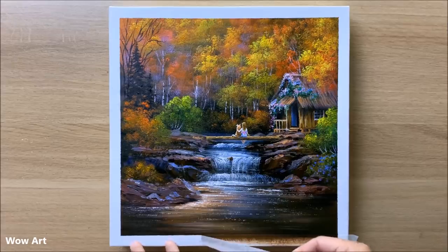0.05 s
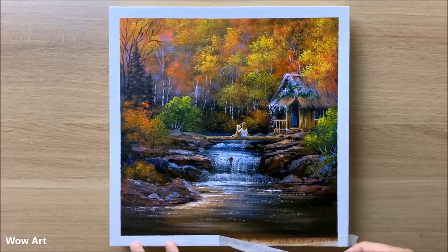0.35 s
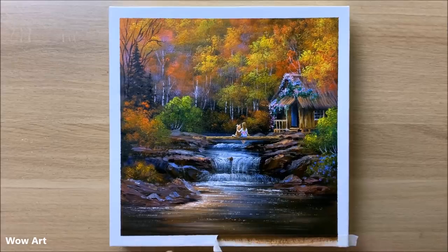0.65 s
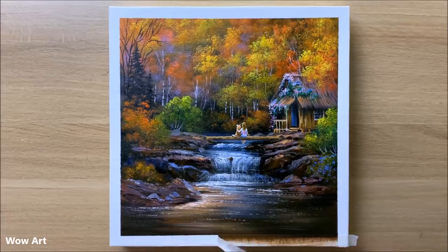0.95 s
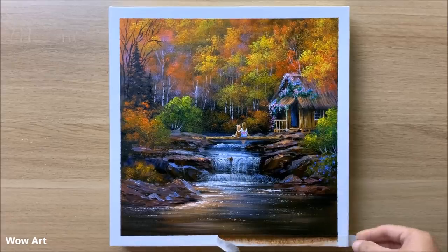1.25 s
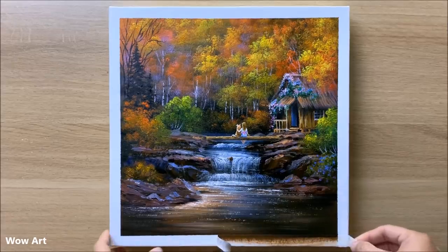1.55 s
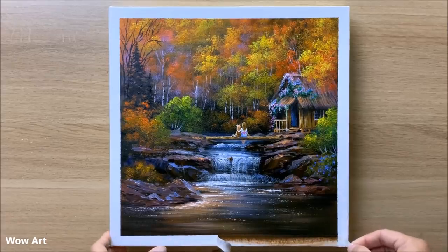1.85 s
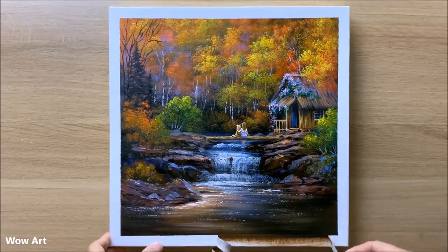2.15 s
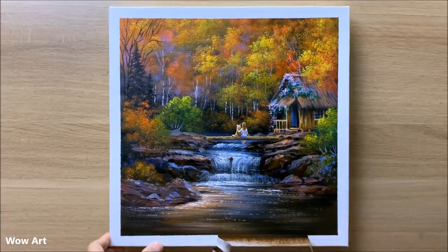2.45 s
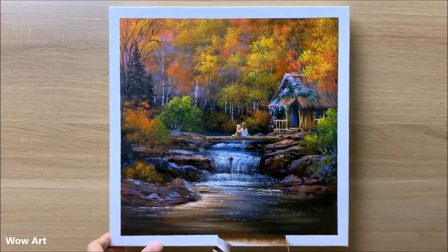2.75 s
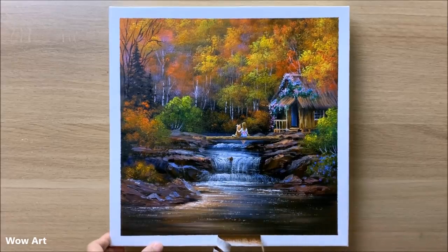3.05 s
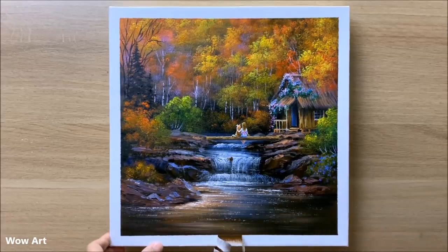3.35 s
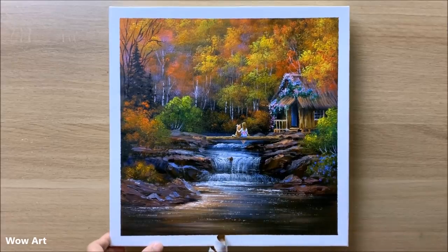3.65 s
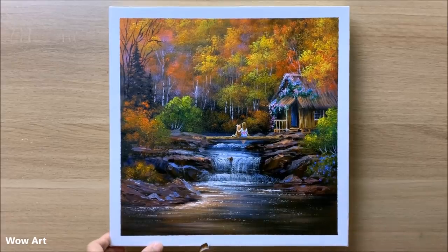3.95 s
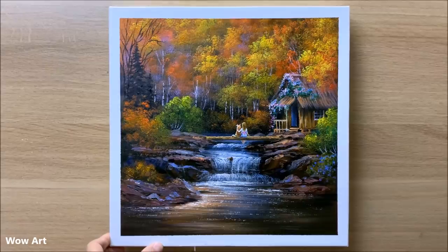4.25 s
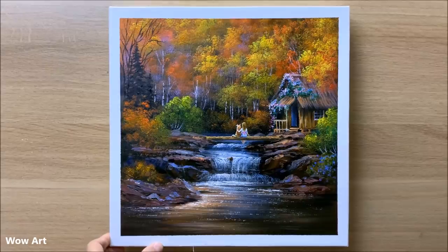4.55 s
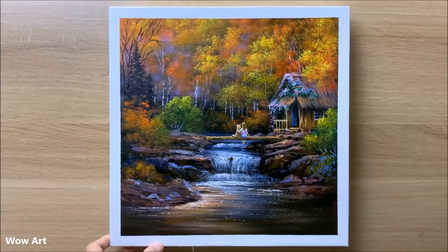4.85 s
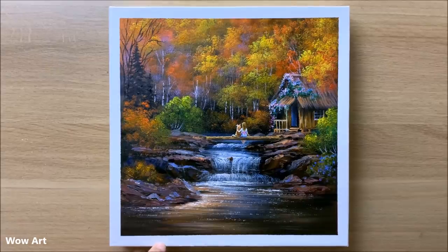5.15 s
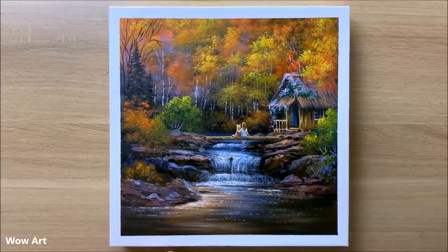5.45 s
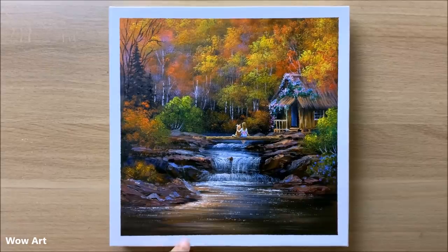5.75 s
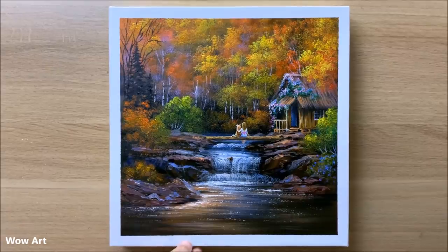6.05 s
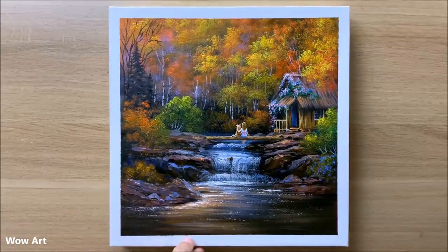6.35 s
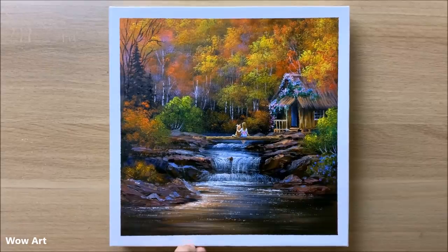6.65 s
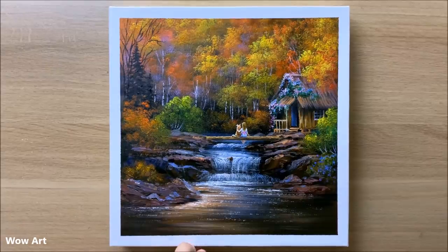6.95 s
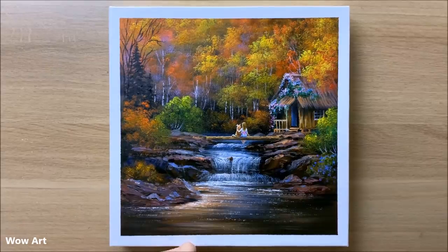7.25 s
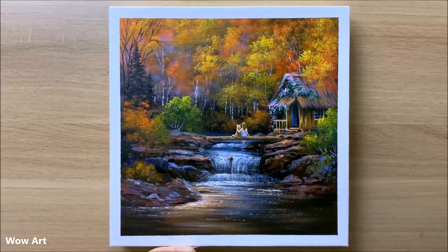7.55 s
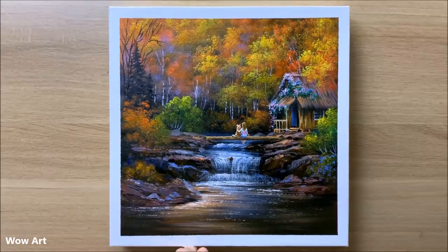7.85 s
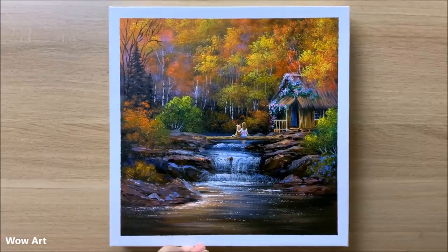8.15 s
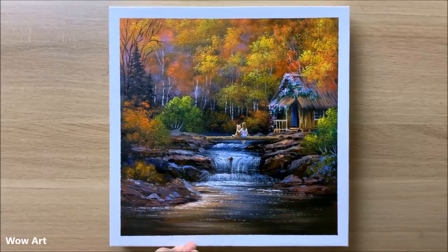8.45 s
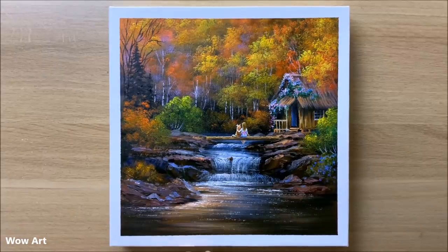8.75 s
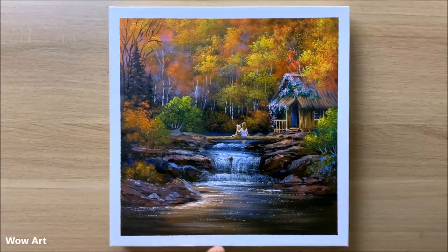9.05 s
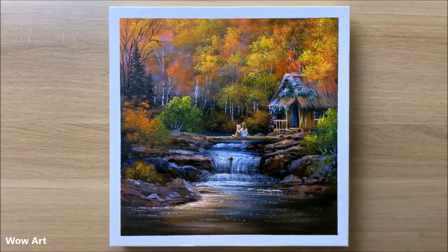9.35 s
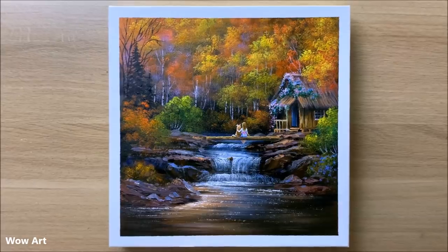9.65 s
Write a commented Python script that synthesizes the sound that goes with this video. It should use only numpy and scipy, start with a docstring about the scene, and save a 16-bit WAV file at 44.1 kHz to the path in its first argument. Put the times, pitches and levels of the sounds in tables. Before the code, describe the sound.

Close to the microphone in a small room, masking tape rips off a painted board in a short pull, then two longer ones back to back. It crackles densely with sharp snaps, and the board thrums beneath. The loose strip is then softly crumpled, and fingers tap and rub the board. Throughout, a faint cricket chirps on the left, and small birds occasionally whistle and trill as if in distant woods.

```python
"""Close and central at the microphone, masking tape comes off a painted board in three slow pulls: a
short one at once, then two back to back from 1.7 s. Glue threads part in a dense crackle with louder
snaps, and the board rings and thrums. From about 4 s the loose strip is crumpled and dropped; after
that, fingers rub and tap the board. Behind it all a cricket chirps on the left, and now and then
small birds whistle and trill far off in echoing woods."""
import sys
import numpy as np
from scipy import signal
from scipy.fft import rfft, irfft, next_fast_len
from scipy.io import wavfile
from scipy.ndimage import uniform_filter1d, map_coordinates

SR = 44100
rng = np.random.default_rng(int(sys.argv[2]) if len(sys.argv) > 2 else 0)


def wrap_up_sound(samples):
    """Save the sound to the file named by the first command line argument, as 16-bit audio."""
    columns = np.atleast_2d(samples).T
    # keep every value between -1 and 1, then stretch to whole-number steps
    tamed = np.clip(columns, -1, 1)
    steps = np.round(tamed * 32767).astype(np.int16)
    wavfile.write(sys.argv[1], SR, steps)


N = 436149

# How hard the tape is drawn, one curve a pull. Each row: time in seconds, effort in dB.
FIRST_PULL = [(0, -46), (0.12, -50.5), (0.25, -46.5), (0.369, -48), (0.45, -63.5), (0.5, -82.5)]
SECOND_PULL = [(1.74, -89), (1.819, -65), (2.0, -70.5), (2.1, -52.5), (2.299, -49.5), (2.88, -51),
               (3.0, -45.5), (3.242, -49), (3.3, -51.5)]
THIRD_PULL = [(3.302, -55), (3.49, -55), (3.6, -50.5), (3.881, -57), (3.98, -54), (4.08, -66.5),
              (4.42, -70), (4.52, -90)]
# Spectra of the flexing board and of a crisp paper crack. Each row: frequency in Hz, relative level in dB.
THRUM_SPECTRUM = [(30, -22), (80, -9), (125, -4), (180, -0.5), (270, -13), (900, -45.5)]
CRISP_SPECTRUM = [(1000, -16.5), (2800, 0), (4400, 3.5), (7000, -4), (11000, 1), (16000, -7.5)]
# The echo among the trees. Each row: frequency in Hz, seconds to fall 60 dB.
WOODS_DECAY = [(3000, 1.0), (8000, 0.46)]


def amp(db):
    """Decibels to gain."""
    return 10 ** (np.asarray(db) / 20)


def unit(x):
    """x at rms 1."""
    return x / np.sqrt(np.mean(x ** 2) + 1e-20)


def along(points, hz):
    """(Hz, value) points read on a log axis."""
    f, v = np.transpose(points)
    return np.interp(np.log(hz + 1), np.log(f), v)


def wobble(rate):
    """A smooth random curve with rate knots a second."""
    return map_coordinates(rng.standard_normal(int(N * rate / SR) + 4), [np.arange(N) * rate / SR])


def swell(length):
    """A smooth rise and fall over length seconds."""
    return np.hanning(round(length * SR))


def add(track, s, x):
    """Mix x into the track from time s on."""
    start = round(s * SR)
    x = x[..., max(-start, 0):max(N - start, 0)]
    track[..., max(start, 0):max(start, 0) + x.shape[-1]] += x


def pan(lean_db):
    """Left and right gains; a positive lean is to the left."""
    gains = amp([[lean_db / 2], [-lean_db / 2]])
    return np.sqrt(2) * gains / np.linalg.norm(gains)


def colour(x, spectrum):
    """x shaped by a spectrum, at rms 1."""
    size = next_fast_len(N + SR // 2)
    gain = amp(along(spectrum, np.fft.rfftfreq(size, 1 / SR)))
    return unit(irfft(rfft(x, size) * gain, size)[..., :N])


def through(x, response):
    """x convolved with a response."""
    return signal.fftconvolve(x, response, axes=-1)[..., :N]


def echo(decays):
    """A stereo tail of energy about 1 a side; each frequency dies at its own speed."""
    hz, t, noise = signal.stft(rng.standard_normal((2, SR + SR // 2)), SR, nperseg=256)
    tail = signal.istft(noise * amp(-60 * t / along(decays, hz)[:, None]), SR, nperseg=256)[1]
    return tail / np.linalg.norm(tail[0])


def air(level_db=-67.5):
    """The faint, even air of the place: two channels of mostly low noise."""
    # Each row: frequency in Hz, relative level in dB.
    spectrum = [(25, -28), (70, 2.5), (130, -1), (250, -13), (500, -20), (1200, -29), (2000, -37.5),
                (7000, -38.5), (15500, -44.5)]
    return amp(level_db) * colour(rng.standard_normal((2, N)), spectrum)


def cricket(chirp_s=0.19, period_s=0.264, stroke_hz=190, chorus=0.42, direct_db=-64.0, wet_db=7.0):
    """Off to the left, swelling runs of wing strokes ring the wing near 5.6 kHz, over a faint chorus."""
    # Bouts of even chirping. Each row: first and last chirp in seconds.
    bouts = [(0.047, 3.06), (3.275, 7.51), (7.94, 8.965), (9.44, 9.93)]
    # The wing's resonance. Each row: frequency in Hz, relative level in dB.
    wing = [(3300, -44), (5000, -20), (5300, -6), (5540, -0.5), (5690, -4), (5830, 3.5), (5950, -13.5),
            (6250, -26.5), (8500, -50.5)]
    effort = np.full(N, chorus)
    for first, last in bouts:
        for s in np.linspace(first, last, round((last - first) / period_s) + 1):
            add(effort, s - chirp_s / 2 - .02, np.sqrt(swell(chirp_s)))
    stroke_phase = (stroke_hz * np.arange(N) / SR + .35 * wobble(60)) % 1
    song = colour(rng.standard_normal(N) * effort * np.exp(-4.5 * stroke_phase), wing)[None]
    near = pan(13) * song
    far = pan(8) * unit(through(song, echo(WOODS_DECAY)))
    return amp(direct_db) * (near + amp(wet_db) * far)


def pips(length=0.028, first_hz=3390, sag_hz=24, fall_hz=70, swing_hz=5, level_db=-52, lean_db=4):
    """Note rows for one bird's run of falling pips, each a little lower than the last."""
    # Each entry: a pip's start in seconds.
    starts = [4.945, 5.02, 5.093, 5.163, 5.243]
    pitches = first_hz - sag_hz * np.arange(len(starts))
    return [(s, length, hz + fall_hz / 2, hz - fall_hz / 2, swing_hz, level_db, lean_db)
            for s, hz in zip(starts, pitches)]


def birds(trill_hz=138, far_direct_db=-3, pip_direct_db=4, skew=1.16):
    """Each note is a gliding tone, shaken by a fast trill and drawn out by the trees; pips are nearer."""
    # Each row: start and length in seconds, first pitch, last pitch and trill swing in Hz,
    # level and leftward pan in dB.
    far_notes = [(0.29, 0.13, 2770, 2676, 48, -41.5, 5.5), (0.46, 0.12, 2790, 2925, 23, -45.5, 22),
                 (0.418, 0.12, 3393, 3260, 240, -38.5, 8.5), (0.565, 0.24, 4370, 4170, 380, -54, 4),
                 (0.56, 0.29, 7500, 7180, 150, -73, -2), (1.005, 0.17, 4170, 3370, 320, -46, 10),
                 (1.11, 0.14, 3543, 3168, 194, -38, 7), (1.651, 0.15, 2526, 2655, 54, -56, 8.5),
                 (1.858, 0.074, 3410, 3262, 103, -38.5, 14), (1.92, 0.12, 3388, 3240, 115, -39, 6.5),
                 (4.275, 0.13, 3594, 3525, 2, -46, -1), (4.352, 0.069, 3557, 3492, 1.8, -34, 3),
                 (4.425, 0.12, 3046, 2990, 2.4, -32.5, -3.5), (4.54, 0.092, 3085, 3030, 3.3, -32.5, 1),
                 (4.595, 0.29, 4495, 4510, 360, -33.5, 5.5), (4.61, 0.22, 4480, 4515, 25, -37, -1.5),
                 (7.04, 0.3, 3690, 3890, 240, -74.5, 7.5), (8.39, 0.06, 3157, 3068, 60, -53.5, 0)]
    out = np.zeros((2, N))
    for notes, direct_db in (far_notes, far_direct_db), (pips(), pip_direct_db):
        for s, length, first_hz, last_hz, swing_hz, db, lean_db in notes:
            u = np.linspace(0, 1, round(length * SR))
            trill = np.sin(2 * np.pi * np.cumsum(trill_hz * (1 + .16 * wobble(110)[:len(u)])) / SR)
            hz = first_hz + (last_hz - first_hz) * u + swing_hz * trill
            pulsing = 1 + min(swing_hz / 600, .9) * trill  # a wide trill also beats in loudness
            envelope = abs(np.sin(np.pi * u ** skew)) ** 0.85  # swells slowly, stops more quickly
            note = envelope * pulsing * np.sin(2 * np.pi * np.cumsum(hz) / SR)
            woods = echo(WOODS_DECAY)
            woods[1] = 0.5 * woods[0] + 1.3 * woods[1]  # both sides hear partly the same trees
            woods[:, 0] += amp(direct_db)
            far = signal.fftconvolve(note[None], woods, axes=1)
            loudest = np.sqrt(uniform_filter1d(np.mean(far ** 2, axis=0), size=2600).max())
            add(out, s, amp(db) * pan(lean_db) * far / loudest)
    return out


def board(spectrum, s, vary_db, lag_s=.0021, detune=.007, size=2048):
    """The board's answer to one pluck at time s. Low bending waves travel slower and arrive later."""
    # Resonances change as the tape comes off. Each row: frequency in Hz, lift in dB in each of the pulls.
    resonances = [(586.3, 6, 8.3, 9), (1005, 8.5, 4.32, 8), (1590, 7.5, 10.9, 8.5), (2170, 6, 2.5, 4.5),
                  (3330, -5, 6, 2.5), (3800, 6, 7.9, 1.5), (4540, 9.5, 4, 5.5), (4870, 9, 5, 10.5),
                  (5400, 0, 2, 7.5), (5820, 1.5, 2.5, 6.5)]
    which_pull = np.searchsorted([SECOND_PULL[0][0], THIRD_PULL[0][0]], s)
    hz = np.fft.rfftfreq(size, 1 / SR)
    db = along(spectrum, hz)
    for mode_hz, *lifts in resonances:
        centre_hz = mode_hz * (1 + detune * rng.standard_normal())
        width_hz = 65 + .022 * mode_hz
        db += lifts[which_pull] / (1 + (2 * (hz - centre_hz) / width_hz) ** 2)
    db += vary_db * unit(uniform_filter1d(rng.standard_normal(len(hz)), size=16))  # each spot's own ring
    cepstrum = irfft(np.log(amp(db)))
    cepstrum[1:size // 2] *= 2  # folded to minimum phase: the ring follows the pluck
    cepstrum[size // 2 + 1:] = 0
    dispersion = 4 * np.pi * lag_s * (np.sqrt(1000 * hz) - hz * np.sqrt(1000 / SR / 2))
    return irfft(np.exp(rfft(cepstrum) - 1j * dispersion))


def pressed(hz, width_octaves, depth_db):
    """The board's spectrum under a finger: one broad hump whose pitch depends on where it is touched."""
    f = np.geomspace(30, SR / 2, 80)
    octaves = np.log2(f / hz)
    db = -depth_db * np.log10(1 + (octaves / width_octaves) ** 2) - 2 * octaves ** 2
    return np.transpose([f, db])


def burst(s, peak_db, spectrum, tear_t60, tear_share, vary_db):
    """One contact: a sudden jolt and a few milliseconds of tearing, sent through the board."""
    t = np.arange(SR // 20) / SR
    tear = tear_share * rng.standard_normal(len(t)) * amp(-60 * t / tear_t60)
    tear[0] = 1  # the jolt
    ring = signal.fftconvolve(tear, board(spectrum, s, vary_db))
    return amp(peak_db) * ring / abs(ring).max()


def threads(rate, spread_db, clump_db):
    """Glue threads parting at random moments: mostly tiny, a few large, in clumps."""
    sizes = amp(spread_db * np.minimum(rng.standard_exponential(N), 4)) * rng.choice([-1, 1], N)
    parting = rng.random(N) < rate / SR
    return unit(sizes * parting * amp(clump_db * wobble(90)))


def taps():
    """Fingers and loose tape tap the board: a light tick, and a dry knock pitched by the spot."""
    # Each row: start in seconds, peaks of tick and knock in dB, knock pitch in Hz.
    touches = [(0.957, -48.5, -57, 794), (1.057, -56, -65, 907), (1.467, -45, -81, 1500),
               (1.8, -56.5, -49.5, 890), (5.238, -39, -49.5, 1060), (5.396, -44.5, -45.5, 1200),
               (5.534, -37.5, -46.5, 745), (5.549, -49, -39, 1009), (9.356, -73, -49, 440),
               (9.516, -58, -58, 1700)]
    out = np.zeros(N)
    for s, tick_db, knock_db, hz in touches:
        hump = pressed(hz, width_octaves=.6, depth_db=14)
        add(out, s, burst(s, tick_db, CRISP_SPECTRUM, tear_t60=.02, tear_share=.25, vary_db=1.5))
        add(out, s, burst(s, knock_db, hump, tear_t60=.035, tear_share=.2, vary_db=1.5))
    return out


def handling():
    """The loose strip rustles; the board thrums as hands flex it and murmurs where fingers slide."""
    # The strip crumpling and the board flexing. Each row: start and length in seconds, level in dB.
    rustles = [(0.88, 0.14, -77), (1.41, 0.13, -76), (4.19, 0.09, -59.5), (4.275, 0.22, -59.5),
               (4.84, 0.08, -72), (5.1, 0.22, -65), (5.375, 0.09, -66), (7.38, 0.2, -85)]
    flexes = [(1.69, 0.18, -56), (3.88, 0.26, -52.5), (5.186, 0.16, -61), (7.8, 0.24, -63)]
    # Sliding fingers. Each row: start and length in seconds, pitch in Hz, level in dB.
    rubs = [(5.506, 0.18, 575, -62), (6.5, 0.42, 1000, -79), (6.952, 0.16, 575, -74.5),
            (8.25, 0.6, 610, -78), (9.088, 0.14, 780, -72.5), (9.334, 0.14, 1380, -70.5)]
    # Crumpling paper. Each row: frequency in Hz, relative level in dB.
    paper_spectrum = [(300, -18.5), (1000, 3), (6000, -8), (11000, 10.5), (16000, -6.5)]
    crumple, flex, rub = np.zeros((3, N))
    skin = rng.standard_normal(N) * amp(1.8 * wobble(31))  # skin drags unevenly
    for envelope, rows in (crumple, rustles), (flex, flexes):
        for s, length, db in rows:
            add(envelope, s, amp(db) * swell(length))
    for s, length, hz, db in rubs:
        stroke = swell(length)
        drag = colour(skin, pressed(hz, width_octaves=0.3, depth_db=11.5))
        add(rub, s, amp(db) * stroke * drag[round(s * SR):][:len(stroke)])
    paper = colour(threads(rate=400, spread_db=3.4, clump_db=4.5), paper_spectrum)
    return crumple * paper + flex * colour(skin, THRUM_SPECTRUM) + rub


def pull_effort(slack_s=0.06, slack_db=17):
    """How hard the hand draws the tape, in dB at every sample."""
    # The hand slackens for an instant. Each entry: time in seconds.
    regrips = [2.17, 3.295]
    t = np.arange(N) / SR
    effort = np.full(N, -150.)
    for rows in FIRST_PULL, SECOND_PULL, THIRD_PULL:
        s, db = np.transpose(rows)
        during = (t >= s[0]) & (t <= s[-1])
        effort[during] = np.interp(t[during], s, db)
    for s in regrips:
        add(effort, s - slack_s / 2, -slack_db * swell(slack_s))
    return effort


def slips(rate_hz, jitter, spread_db, tear_t60):
    """The edge sticks and slips at an uneven pace; each slip is a brief tear of a new size."""
    turns = np.cumsum(rate_hz * np.exp(jitter * wobble(70))) / SR
    onsets = np.diff(np.floor(turns), prepend=0)
    sizes = amp(spread_db * np.clip(rng.standard_normal(N), -2, 1.5))
    fade = amp(-60 * np.arange(SR // 20) / SR / tear_t60)
    return unit(rng.standard_normal(N) * through(onsets * sizes, fade))


def peeling(effort, steady_db=-52, spot_s=.15):
    """Slips and parting threads crackle in the paper, rasp in the taut strip and pluck the board."""
    # Spectra of paper, strip and board. Each row: frequency in Hz, relative level in dB.
    crackle = [(300, -49), (1200, -22), (2500, 3.5), (4400, -10.5), (6000, 12.5), (7500, 6.5), (10500, 6),
               (16000, -8)]
    rasp = [(2000, -33.5), (3600, -1), (5000, 0.5), (6200, -7), (9000, -26.5)]
    knock = [(35, -37), (100, -12), (380, -9), (520, 0), (750, -1.5), (1200, -6.5), (2200, -8.5),
             (3500, -22.5), (8000, -65.5)]

    def driven(offset_db, slope):
        """A gain that grows by slope dB for each dB of effort."""
        return amp(steady_db + offset_db + slope * (effort - steady_db))

    parting = threads(rate=7000, spread_db=1.5, clump_db=4.5)
    plucks = unit(parting + slips(rate_hz=88, jitter=.3, spread_db=1.0, tear_t60=0.017))
    flexing = rng.standard_normal(N) * amp(0.73 * wobble(25))  # the uneven pull flexes the whole board
    out = driven(offset_db=-4.5, slope=0.89) * colour(flexing, THRUM_SPECTRUM)
    for spectrum, offset_db, slope in (crackle, -2, 0.75), (rasp, -1.5, 0.92), (knock, -0.68, 1):
        force = driven(offset_db, slope) * plucks
        for s in np.arange(0, THIRD_PULL[-1][0], spot_s):  # the peeling edge travels from spot to spot
            spot = board(spectrum, s + spot_s / 2, vary_db=2.0)
            push = force[round(s * SR):round((s + spot_s) * SR)]
            add(out, s, signal.fftconvolve(push, spot / np.linalg.norm(spot)))
    return out


def small_patches(effort, per_second=50, over_effort_db=11.5, spread_db=4.5, knock_offset_db=-5.5):
    """Snap rows for lesser patches of glue that let go at random moments, sized by the effort."""
    chance = rng.random((400, 3))
    times = np.cumsum(0.5 + chance[:, 0]) / per_second
    scatter_db = spread_db * (2 * chance[:, 1:] - 1)
    rows = []
    for s, (crack, knock) in zip(times, scatter_db):
        if s < THIRD_PULL[-1][0]:
            db = effort[int(s * SR)] + over_effort_db
            rows.append((s, db + crack, db + knock + knock_offset_db))
    return rows


def snaps(effort):
    """A patch of glue gives way: the paper cracks, crisper in the first pull, and the board knocks."""
    # Each row: start in seconds, peaks of the paper's crack and the board's knock in dB.
    large_patches = [(0.0117, -25, -37.5), (0.0344, -20, -44), (0.0453, -25.5, -52), (0.058, -27, -45.5),
                     (0.0896, -26, -42.5), (0.1104, -24.5, -39), (0.1374, -26.5, -41.5),
                     (0.1693, -24.5, -39), (0.197, -19.5, -27.5), (0.2529, -23, -29), (0.288, -27.5, -47),
                     (0.3161, -26, -42), (0.358, -28, -39), (0.37, -28, -43), (2.0687, -30.5, -51),
                     (2.2219, -26, -35), (2.351, -21.5, -28.5), (2.4044, -29, -32), (2.4486, -27, -30),
                     (2.4939, -27.5, -34.5), (2.6103, -29, -31), (2.6786, -27, -32), (2.7708, -29, -32.5),
                     (2.8085, -28, -36), (2.8304, -26.5, -33), (2.902, -28, -53), (3.0289, -28, -38.5),
                     (3.0836, -29, -33), (3.1114, -29.5, -44), (3.2034, -28, -35.5), (3.353, -35.5, -38),
                     (3.3984, -27, -45), (3.4521, -32.5, -49.5), (3.5265, -32, -28.5),
                     (3.5543, -27.5, -40.5), (3.5692, -27, -34), (3.6107, -22, -38.5), (3.6351, -30, -34),
                     (3.7156, -29, -38), (3.7796, -30, -41), (3.8314, -30.5, -35), (3.9316, -24, -28.5),
                     (4.0051, -31, -39.0)]
    # The crack in the later pulls. Each row: frequency in Hz, relative level in dB.
    duller_spectrum = [(300, -18.5), (1000, -8.5), (2000, 0.5), (6000, 2), (7500, -3), (16000, -9.5)]
    hollow = pressed(hz=620, width_octaves=.6, depth_db=13)
    out = np.zeros(N)
    for s, crack_db, knock_db in list(large_patches) + small_patches(effort):
        paper = CRISP_SPECTRUM if s < FIRST_PULL[-1][0] else duller_spectrum
        add(out, s, burst(s, crack_db, paper, tear_t60=.015, tear_share=.28, vary_db=2.0))
        add(out, s, burst(s, knock_db, hollow, tear_t60=.014, tear_share=.12, vary_db=2.0))
    return out


def scene():
    """Tape close to the microphone in a small room, with faint air and distant wildlife behind it."""
    # The room's echo. Each row: frequency in Hz, seconds to fall 60 dB.
    room_decay = [(150, 0.5), (14000, 0.13)]
    effort = pull_effort()
    tape = peeling(effort) + handling() + snaps(effort) + taps()
    walls_mid, walls_side = through(tape[None], echo(room_decay))
    air_mid, air_side = air()
    mid = tape + amp(-14) * walls_mid + air_mid
    side = amp(-28) * walls_side + amp(-23) * air_side
    return np.array([mid + side, mid - side]) + cricket() + birds()


def record(dry):
    """Nothing is kept above the band limit."""
    top_hz = 16000
    size = next_fast_len(N + SR // 2)
    passband = np.fft.rfftfreq(size, 1 / SR) < top_hz
    return irfft(rfft(dry, size) * passband, size)[:, :N]


dry = scene()
out = record(dry)
wrap_up_sound(out)
```